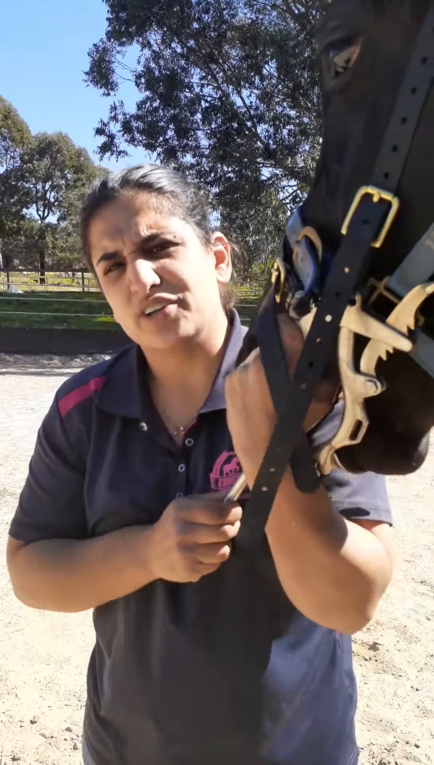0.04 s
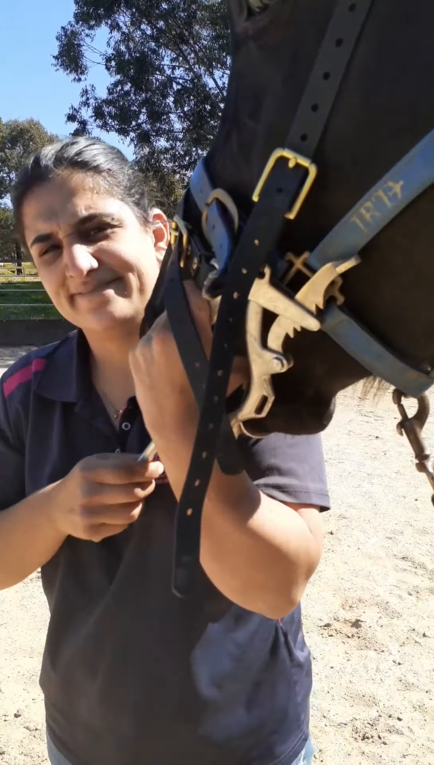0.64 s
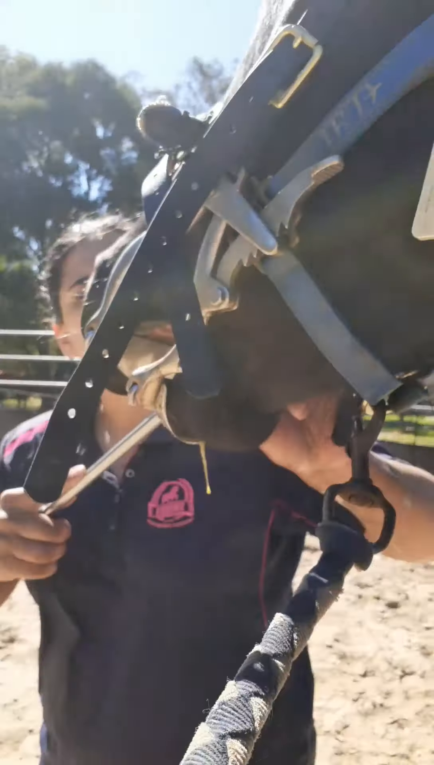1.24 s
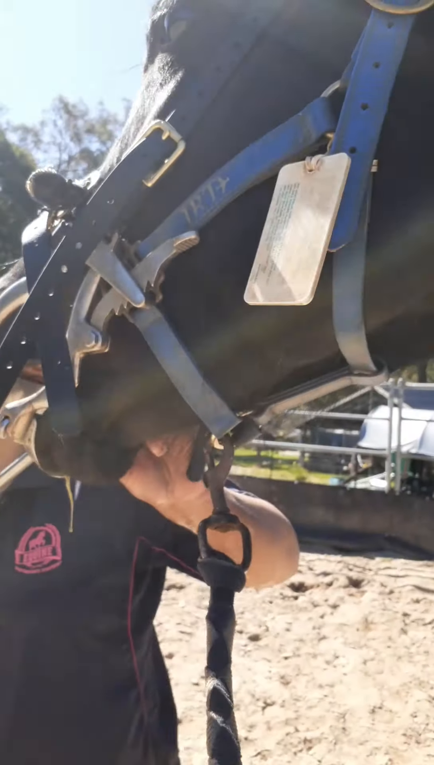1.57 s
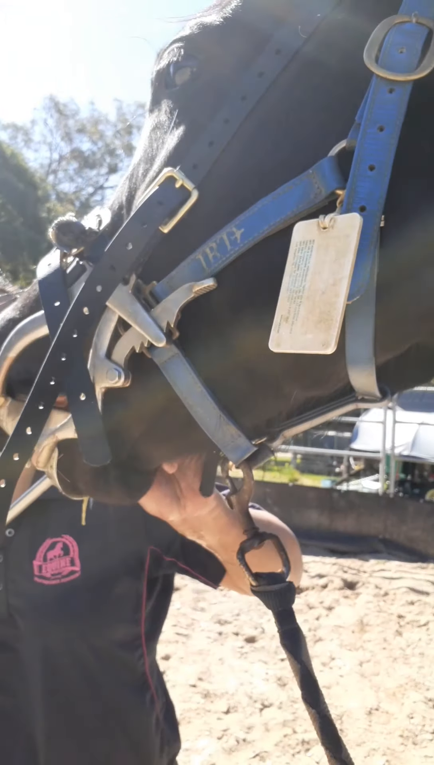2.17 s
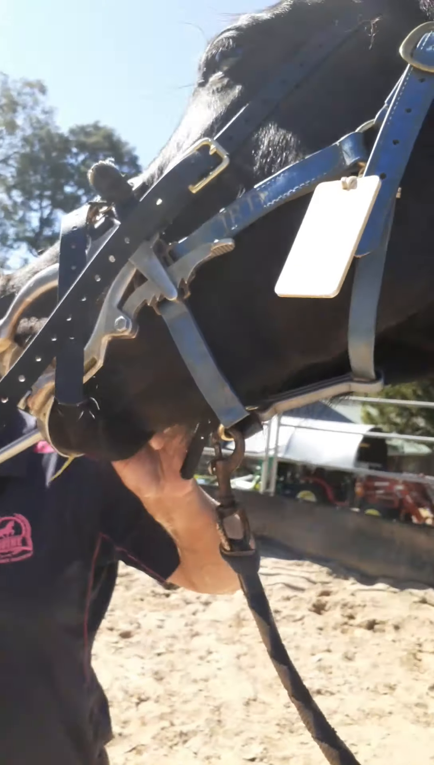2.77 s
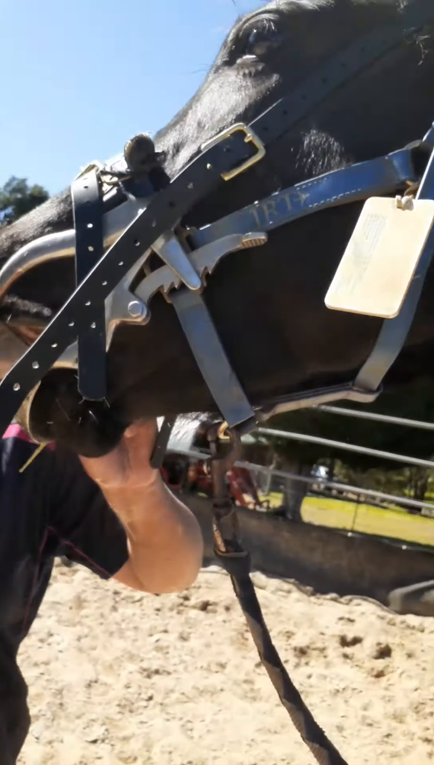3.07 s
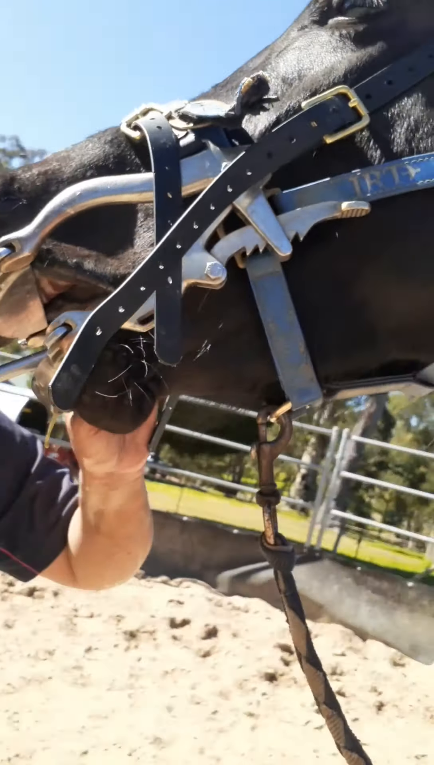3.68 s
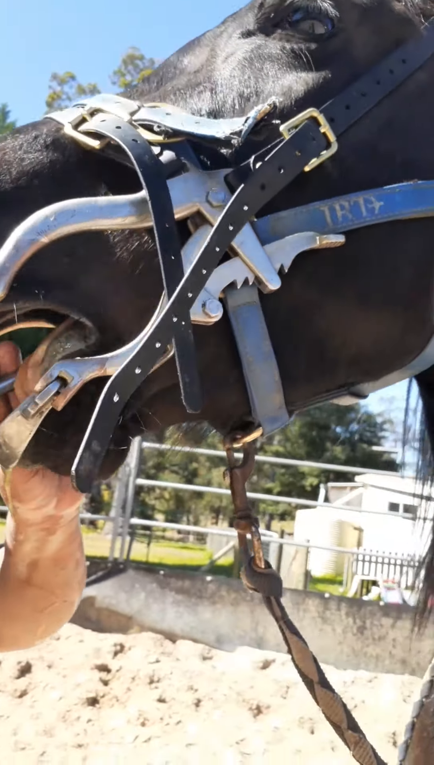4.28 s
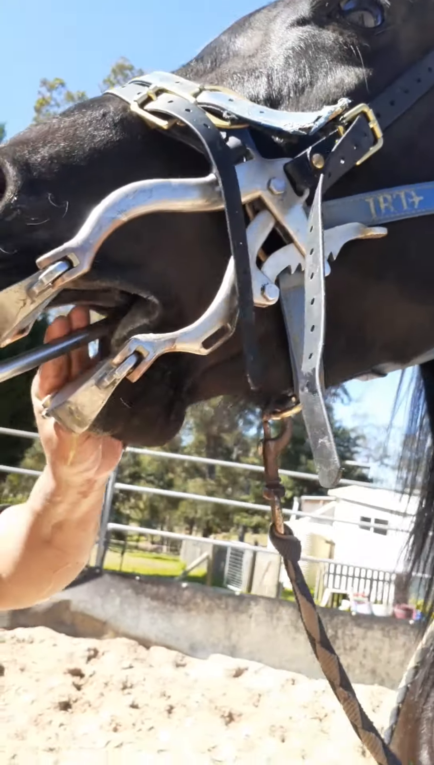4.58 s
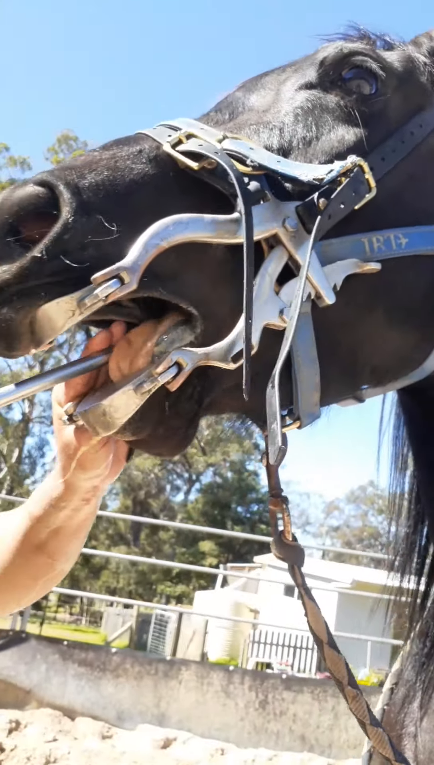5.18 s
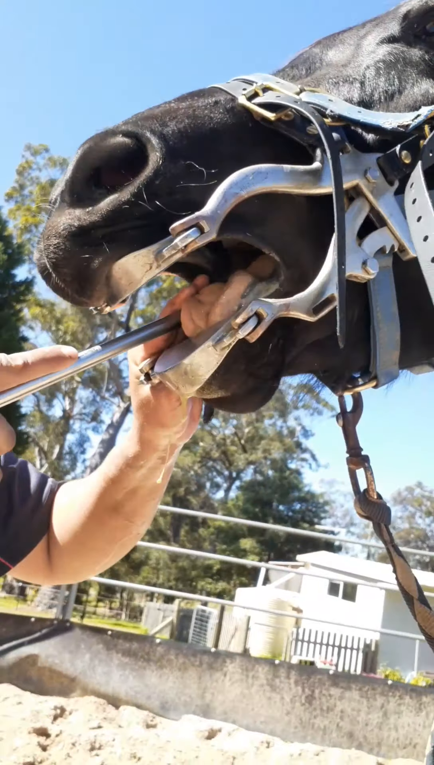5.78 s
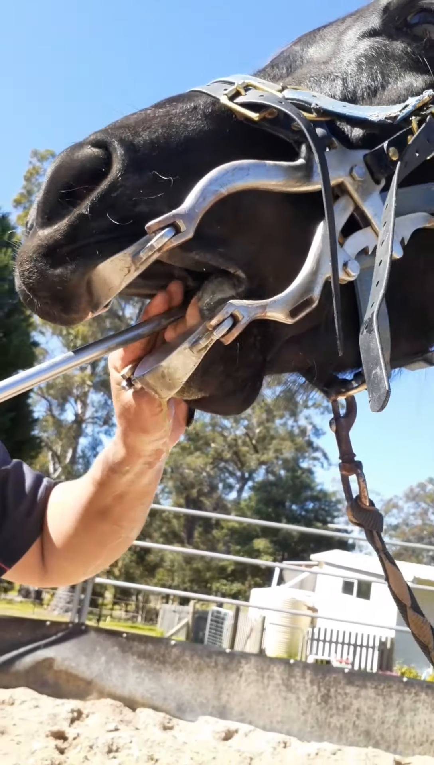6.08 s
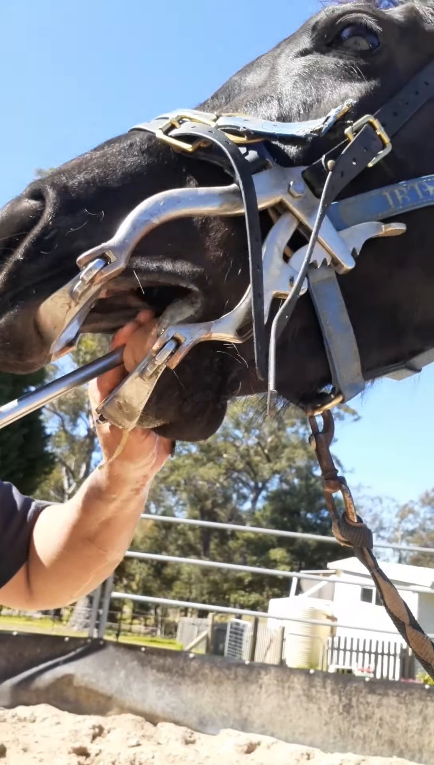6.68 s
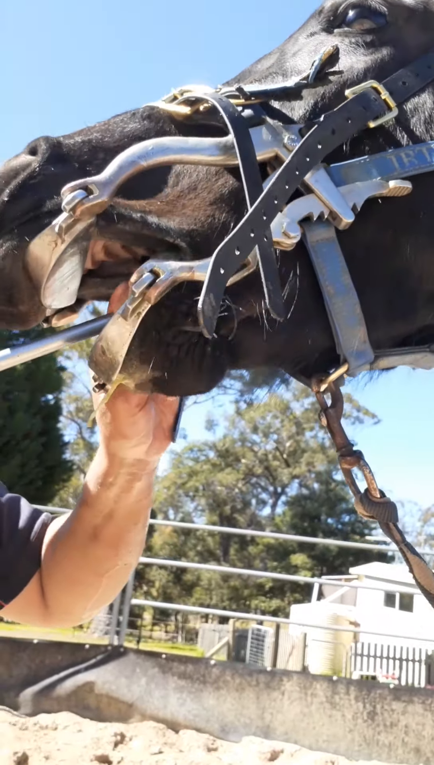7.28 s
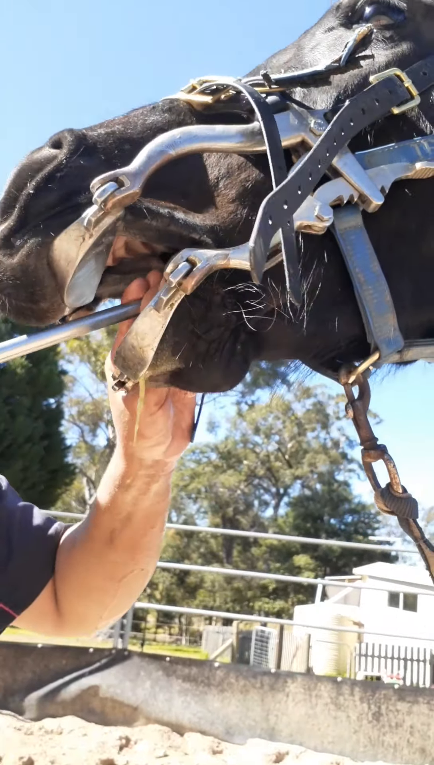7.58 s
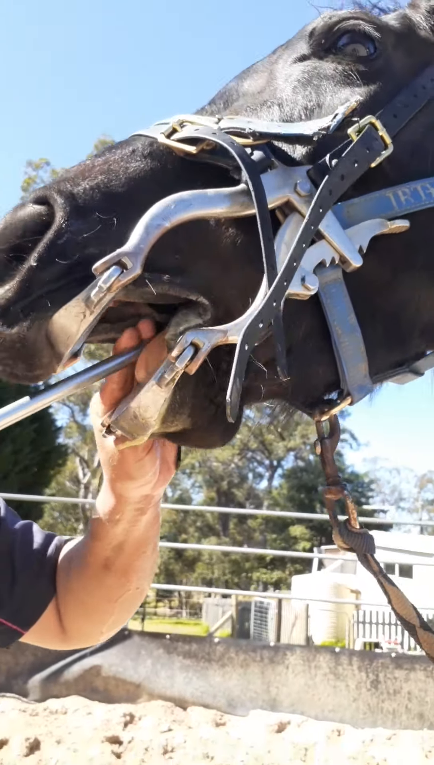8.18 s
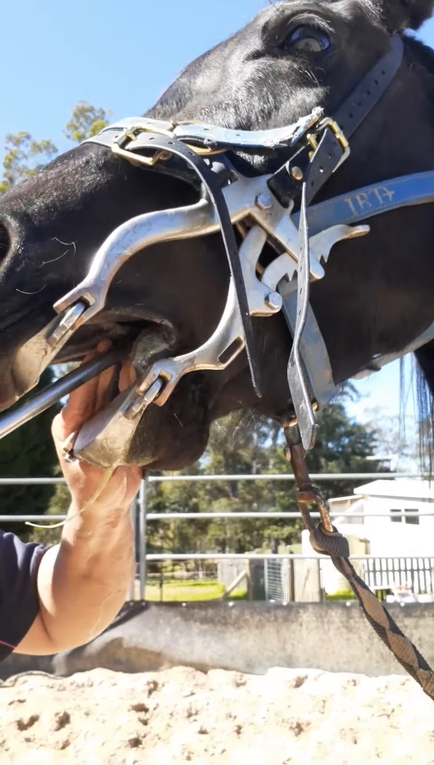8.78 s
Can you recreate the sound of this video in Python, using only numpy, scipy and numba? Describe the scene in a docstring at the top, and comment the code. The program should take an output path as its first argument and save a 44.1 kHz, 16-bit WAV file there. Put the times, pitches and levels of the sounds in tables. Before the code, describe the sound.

A steel hand file rasps on a horse's teeth close to the microphone, a gritty grinding over a hollow, jug-like boom from the open mouth. It begins with quick short rubs, with a dull bump on the jaw at about 0.4 seconds. From about 1.3 seconds the strokes lengthen into a steady rhythm of brighter pushes and duller pulls, a little over two pairs a second, continuing until the end near 9 seconds. The file often catches and gives tiny ragged squeaks, mostly around 2 seconds and from 4 to 8 seconds. Small metallic clicks against the mouth brace come at about 1.6, 3.9 to 4.6, 6, 7.3 and 8.6 seconds, with another short knock near 4.4 seconds. Light wind rumbles on the microphone around 1.4, 3.2 and 8.5 seconds, over a faint, steady outdoor hush.

```python
"""Quick, gritty rubs over a hollow boom: a steel hand rasp on a horse's cheek teeth, outdoors and close by.
Longer pushes and duller pulls follow in turn. Each chip of enamel is an impulse that excites the modes
of jaw and shaft, while the propped-open mouth booms like a jug, as a Helmholtz resonator.
The rasp catches, chatters by stick-slip, knocks on the metal gag and bumps the jaw.
Light wind brushes the microphone over a faint open-air hush."""
import sys
import numpy as np
from scipy import signal
from scipy.fft import rfft, irfft, next_fast_len
from scipy.io import wavfile
from scipy.ndimage import uniform_filter1d, map_coordinates
from numba import njit

SR = 44100
rng = np.random.default_rng(int(sys.argv[2]) if len(sys.argv) > 2 else 0)


def store_pcm(level_fs):
    """Save levels as 16-bit WAV."""
    pcm = np.round(np.clip(level_fs, -1, 1) * 32767).astype(np.int16)
    wavfile.write(sys.argv[1], SR, np.atleast_2d(pcm).T)


N = 389403
TIME = np.arange(N) / SR

# Strokes of the rasp: start t/s, length/s, grinding level/dB, boom re grinding/dB, brightness/dB,
# mouth resonance f/Hz
RUB_STROKES = [(-0.11, 0.14, -28.5, 2.5, 0, 350), (0.043, 0.18, -32, 6.5, 0, 378),
               (0.207, 0.19, -34, 5, 2.5, 381), (0.389, 0.15, -31.5, 7.5, -1, 366),
               (0.542, 0.16, -36.5, 11.5, 3, 347), (0.732, 0.12, -34, 8, -0.5, 342),
               (0.88, 0.14, -36, 13.5, 1.5, 358), (1.018, 0.162, -31.5, 4.5, -1.5, 371),
               (1.175, 0.14, -28, 3, 2.5, 364), (7.166, 0.072, -38.5, 10.5, 0.5, 346),
               (7.602, 0.071, -36.5, 13, -6, 320)]  # short and quick, over one spot
PUSH_STROKES = [(1.274, 0.2, -35, -3.5, -1, 354), (1.685, 0.21, -33.0, -1.5, -1.5, 348),
                (2.124, 0.21, -37, 2, 2.5, 381), (2.585, 0.2, -35.5, 7, -1.5, 354.6),
                (2.976, 0.2, -37, -5, -3, 358), (3.413, 0.21, -29, -2.5, -3, 399),
                (3.898, 0.13, -33, 7, 1, 412), (4.258, 0.22, -29.0, 0, -5.5, 367.4),
                (4.72, 0.19, -28.5, -4, -1.5, 387.6), (5.13, 0.224, -28.5, -4, 1, 375.5),
                (5.57, 0.2, -31, 0, -1, 337), (5.969, 0.19, -31, -0.5, -0.5, 339),
                (6.399, 0.1993, -36, 12, -0.5, 358), (6.823, 0.2, -28.0, 2, -2.5, 324),
                (7.245, 0.21, -26.5, 0, -4, 368), (7.68, 0.19, -29.5, 1, 0, 328),
                (8.086, 0.19, -32, -1.5, 2.5, 420), (8.543, 0.15, -37, 8, -2.5, 371)]  # forward: the teeth cut
PULL_STROKES = [(1.487, 0.2, -31, -4, -2, 400), (1.894, 0.22, -38, 3, -2.5, 334),
                (2.331, 0.24, -33, 0.5, -2, 381), (2.744, 0.18, -37, -2.5, -4.5, 360),
                (3.206, 0.2, -32, -2, -1.5, 357.4), (3.611, 0.21, -34.5, 7, -1, 354),
                (4.05, 0.219, -30.5, 1.5, -3.5, 381.7), (4.476, 0.25, -31.5, -1, 0, 378.4),
                (4.914, 0.21, -26.5, -2, -1, 364), (5.34, 0.25, -32, 5, 3, 341),
                (5.794, 0.2, -39.5, 14.5, 2.5, 392.6), (6.165, 0.23, -33, 4.5, -1.5, 337),
                (6.609, 0.211, -33, 8, 1.5, 377.4), (7.058, 0.11, -34.5, 8.5, -3, 348),
                (7.409, 0.19, -30, 2.5, -2.5, 324), (7.891, 0.21, -30.5, 6, -0.5, 371.6),
                (8.291, 0.21, -31.5, 7, -5, 318), (8.759, 0.096, -37, 8.5, -9, 401)]  # back: the teeth slide


def rasp():
    """Source and filter: one chipping force drives jaw, shaft and mouth; the strokes set their levels."""
    speed, boom, grind, shaft, grit = strokes()
    scrape_gain, boom_gain = catches()
    force = chipping(speed)
    body = jaw(force)
    hollow = spread(evened(band(body, 576, 2600), 0.11), scattered=0.22)
    grinding = from_db(-0.27) * ring_on(grind, 0.00033) * hollow
    ringing = from_db(0.5) * shaft * spread(evened(band(body, 2740, 4800), 0.094), scattered=0.37)
    gritty = from_db(0.5) * grit * spread(evened(band(body, 4870, 11100), 0.076), scattered=0.45)
    thudding = from_db(-21) * spread(rms_one(band(force, 196.6, 236, order=2)), scattered=0.067)
    cavity = spread(np.array([mouth(f) for f in force]), scattered=0.049)
    judder = from_db(2.43 * drift(70))  # the jaw is shaken unevenly
    booming = ring_on(boom * boom_gain * judder, 0.0072) * from_db(1.5) * cavity + boom * thudding
    scraping = scrape_gain * (grinding + ringing + gritty) + cheek_pocket(force) + chatter()
    return scraping * from_db([[0.4], [-0.4]]) + booming * from_db([[-0.4], [0.4]])


def strokes(grind_power=0.87, bright_power=1.37):
    """Friction noise grows with pressure and as a power of sliding speed, the treble most steeply."""
    speed, power = np.zeros(N), np.zeros((4, N))
    # strokes, shaft ring re grinding/dB, grit re grinding/dB, growth of pressure along the stroke/dB
    kinds = [(RUB_STROKES, -6, -11, 0.44), (PUSH_STROKES, -5, -7, 8.3), (PULL_STROKES, -6.5, -17, 5.7)]
    for rows, shaft_db, grit_db, growth_db in kinds:
        for start, length, db, boom_db, bright_db, _ in rows:
            on = slice(max(0, int(start * SR)), int((start + length) * SR))
            travel = np.clip((TIME[on] - start) / length, 0, 1)
            pace = np.sin(np.pi * travel) + 1e-6
            pressure = from_db(db + growth_db * (travel - 0.5))
            bright = from_db(bright_db) * pace ** bright_power
            parts = [from_db(boom_db) * pace, pace ** grind_power,
                     from_db(shaft_db) * bright, from_db(grit_db) * bright]
            power[:, on] += (pressure * np.array(parts)) ** 2  # overlapping strokes add in power
            speed[on] = np.maximum(speed[on], pace)
    boom, grind, shaft, grit = np.sqrt(power)
    return speed, boom, grind, shaft, grit


def chipping(speed, chips_per_s=6000, size_db=2.5, dust=0.25, grabs_per_s=110, grab_s=0.0054):
    """Brittle fracture: enamel chips off as shot noise. Two rows, for direct and scattered sound."""
    grabs = (rng.random(N) < grabs_per_s / SR) * rng.uniform(0.12, 7.7, N)
    bite = 1 + 0.87 * rms_one(ring_on(grabs + 1e-18, grab_s))  # sudden grabs swell the force
    breaks = rng.random(N) < chips_per_s * (0.3 + speed) / SR
    sizes = from_db(size_db * np.minimum(rng.exponential(1, N), 4))
    chips = rms_one(breaks * sizes * rng.standard_normal((2, N)))
    return bite * (chips + dust * rng.standard_normal((2, N)))


def jaw(force, broad_db=-7.0, wander=0.05, patchy_db=6.5):
    """Modal response: the resonances of jaw and rasp shift and trade strength as the contact travels."""
    # Broad spectrum of the scraping: f/Hz, relative spectral level/dB
    scrape_spectrum = [(290, -99), (500, -14), (922, 3.5), (1130, 3.5), (1510, -1), (1820, 0.5),
                       (2340, 3.5), (2740, -11), (3300, -11), (5190, -32), (8840, -13.5), (10900, -21),
                       (12000, -78), (15600, -73), (22000, -120)]
    # Modes of jaw, teeth and rasp from three listening places: f/Hz, bandwidth/Hz, relative level/dB
    front_modes = [(750, 230, 10), (1550, 81, -3), (2310, 110, -17), (3340, 150, -4.5), (3840, 130, -9),
                   (5420, 480, -13), (7640, 250, -22), (8800, 170, -7.5)]
    cheek_modes = [(673, 73, 2), (960, 71, -6), (1503, 150, -0.5), (2372, 21, 2), (3275, 110, -6.5),
                   (4620, 34, -14), (5570, 120, -34), (5810, 32, -12.5), (8490, 120, -18),
                   (9160, 63, -15.5)]
    muzzle_modes = [(912, 55, 8.5), (1497, 168, 2), (2265, 41, 0), (3306, 163, -4), (4593, 60, -13.5),
                    (5620, 110, -16.5), (6040, 260, -19.5), (7480, 39, -15.5), (8480, 200, -14.5),
                    (9570, 420, -22)]
    edges = [0, int(1.3 * SR), int(3.4 * SR), N]  # the listening place changes twice
    out = from_db(broad_db) * coloured(force, scrape_spectrum)
    for modes, first, last in zip([front_modes, cheek_modes, muzzle_modes], edges, edges[1:]):
        on, rings = slice(first, last), 0
        for hz, width, db in modes:
            centre = hz * (1 + wander * drift(14)[on] * min(1, np.sqrt(1000 / hz)))
            gain = from_db(db + patchy_db * drift(18)[on])
            rings = rings + gain * np.array([resonate(f[on], centre, float(width), SR) for f in force])
        out[:, on] += rms_one(rings)
    return out


def mouth(force, width_hz=24.0, skirt_hz=95.0, waver=0.013, steady_s=0.049):
    """Helmholtz resonance: the air in the open mouth booms at a pitch set by the gape."""
    pitches = [(start + length * part, hz)
               for start, length, *_, hz in [*RUB_STROKES, *PUSH_STROKES, *PULL_STROKES]
               for part in (0.25, 0.75)]
    hz = curve(sorted(pitches)) * (1 + waver * drift(22))
    ring = resonate(force, hz, width_hz, SR)
    return evened(resonate(ring, hz, skirt_hz, SR), steady_s)


def catches(rise_s=0.0086, scrape_s=0.026, boom_s=0.019):
    """Loading and release: the force jumps at an enamel point and relaxes. Gains for scrape and boom."""
    # Catches on enamel points: t/s, change of scrape level/dB, change of boom level/dB
    snags = [(0.12,5,4.5), (0.331,2,1), (.174,5,-4), (.471,-0.5,0), (.756,4,8), (.937,4,-2), (1.056,1,9),
             (1.132,2.5,9), (1.22,1,1), (1.437,7.5,12), (1.533,6,10), (1.773,-1,14), (1.851,5.5,11.5),
             (1.963,8.5,10), (2.069,9.5,-7), (2.403,0,7.5), (2.681,7,-4), (2.819,7,19), (3.111,6,17),
             (3.127,3,12.5), (3.249,1,11.5), (3.437,2.5,-3), (4.125,0,7), (4.197,5,7), (4.42,-0.5,-5),
             (5.054,1,7.5), (5.084,9,13.5), (5.19,1.5,4), (5.519,6,8.5), (5.65,3,13), (5.898,14.5,-3),
             (5.932,15,-7), (6.13,6,16), (6.337,10.5,4), (6.42,14,-5), (6.446,8,5), (6.476,8.5,10),
             (6.736,6.5,-9), (6.758,2.5,2), (6.896,5.5,1), (6.992,4,8), (7.09,3,-1.5), (7.36,3.5,6),
             (7.616,9,1), (7.815,3,13.5), (8.038,9.5,7), (8.178,4,9), (8.214,5.5,-1.5), (8.4,2.5,4),
             (8.563,9,14), (8.636,12.5,-2)]
    t, scrape, boom = TIME[::20], 0, 0
    for at, scrape_db, boom_db in snags:
        scrape = scrape + scrape_db * gaussian(t - at, np.where(t < at, rise_s, scrape_s))
        boom = boom + boom_db * gaussian(t - at, np.where(t < at, rise_s, boom_s))
    return from_db(np.interp(TIME, t, scrape)), from_db(np.interp(TIME, t, boom))


def cheek_pocket(force, width_hz=120.0, skirt_hz=500.0, waver=0.046, swell_power=0.74):
    """Cavity resonance: the rasp opens a pocket between cheek and teeth, whose note glides with it."""
    # Notes of the pocket: start t/s, length/s, first f/Hz, last f/Hz, level/dB
    glides = [(1.31,0.18,1420,2210,-34.5), (1.52,0.17,2230,2290,-32.5), (1.69,0.22,1400,852,-33.5),
              (1.92,0.19,1100,1300,-37), (2.14,0.2,1210,990,-36), (3.24,0.17,2200,2100,-38),
              (3.43,0.14,1450,990,-43.5), (3.64,0.21,900,760,-35.5), (3.93,0.095,1450,1730,-23.5),
              (4.05,0.11,1730,1430,-40), (5.17,0.19,1260,1470,-29), (5.37,0.19,1570,1430,-30),
              (5.6,0.26,1130,950,-38), (5.85,0.079,1260,1800,-28), (6.25,0.15,1250,1410,-38),
              (6.42,.16,1300,890,-38), (7.07,.07,1780,2200,-28), (8.33,0.11,1500,1520,-37)]
    pitches, strength = [], 0
    for start, length, first_hz, last_hz, db in glides:
        pitches += [(start, first_hz), (start + length, last_hz)]
        swell = np.sin(np.pi * np.clip((TIME - start) / length, 0, 1))
        strength = strength + from_db(db) * swell ** swell_power
    hz = curve(pitches) * (1 + waver * drift(45))
    rings = [resonate(resonate(f, hz, width_hz, SR), hz, skirt_hz, SR) for f in force]
    return strength * spread(evened(np.array(rings), 0.23), scattered=0.15)


def chatter(rough=0.035, flutter_db=3.5):
    """Stick-slip oscillation locks on to one resonance and gives a short, ragged near-tone."""
    # Squeals: centre t/s, half length/s, f/Hz, level/dB
    squeals = [(1.346,0.015,1464,-20.5), (1.569,0.016,2320,-22), (2.02,.09,3170,-33.5),
               (2.07,.012,3300,-28.5), (2.159,0.048,3200,-36), (2.682,.025,3230,-29), (3.959,.012,1537,-17),
               (3.981,.012,1746,-18), (4.822,.022,943,-22), (5.021,0.045,970,-22), (5.534,0.036,1410,-20.5),
               (6.318,0.056,937,-22.5), (6.915,.024,1537,-16.5), (7.207,0.036,1508,-26),
               (7.37,0.021,960,-16), (7.525,.052,1540,-21.5), (7.785,0.063,919,-22.5),
               (8.012,0.032,1520,-22), (8.014,0.077,2400,-25.5), (8.038,0.017,3350,-31)]
    out = np.zeros(N)
    waver = 1 + rough * drift(450)
    flutter = from_db(flutter_db * drift(220))
    for at, half_s, hz, db in squeals:
        on = np.flatnonzero(np.abs(TIME - at) < half_s)
        swell = np.cos(np.pi / 2 * (TIME[on] - at) / half_s) ** 4
        out[on] += from_db(db) * swell * np.sin(2 * np.pi * np.cumsum(hz * waver[on]) / SR)
    return out * flutter


def gag_clinks(ring_db=20.0, ring_t60=0.018, knock_db=-8.0, knock_t60=0.027, crack_db=23.0, crack_t60=0.05):
    """Hard impact: steel on steel excites a wide band of modes, damped quickly by lips and hand."""
    # Knocks on the gag: t/s, base level of knock and ring/dB, ring f/Hz, base level of crack/dB
    impacts = [(1.5618, -38, 2250, -88), (3.9035, -46, 1940, -79), (3.9316, -40, 1560, -49),
               (4.1111, -50, 1580, -55.5), (4.4543, -37.5, 8700, -44.5), (4.5918, -36, 1320, -43.5),
               (5.9693, -39, 1710, -48.5), (6.0512, -29.5, 4356, -50), (6.1807, -46, 1206, -71),
               (7.302, -37, 1440, -44), (8.2921, -41.5, 1970, -75), (8.5607, -38, 4248, -82),
               (8.5964, -26.5, 4050, -73), (8.7779, -37.5, 971, -54)]
    out, t = np.zeros((2, N + SR)), TIME[:SR // 8]
    for at, db, hz, treble_db in impacts:
        noise = spread(rng.standard_normal((2, len(t))), scattered=0.64)
        crack = rms_one(band(noise, 1100, 10200, order=1)) * decay(t, treble_db + crack_db, crack_t60)
        knock = rms_one(band(noise, hz / 2, hz * 2, order=2)) * decay(t, db + knock_db, knock_t60)
        ring = np.sin(2 * np.pi * hz * t) * decay(t, db + ring_db, ring_t60)
        first = int(at * SR)
        out[:, first:first + len(t)] += crack + knock + ring
    return out[:, :N]


def jaw_bumps(rise_s=0.0023):
    """Soft impact: each blow leaves one low mode in damped free vibration."""
    # Blows on the jaw: t/s, f/Hz, level/dB, decay time t60/s
    blows = [(0.423, 235, -14, 0.14), (4.379, 550, -13.5, 0.056)]
    out = np.zeros(N)
    for at, hz, db, t60 in blows:
        t = np.clip(TIME - at, 0, 1)
        out += np.sin(2 * np.pi * hz * t) * (1 - np.exp(-t / rise_s)) * decay(t, db, t60)
    return out


def wind(breeze_db=-64, gain_db=4.5, buffet_db=7.2):
    """Turbulence: eddies press on the microphone as a lumpy rumble, partly separate in each channel."""
    # Spectrum of the eddies: f/Hz, relative spectral level/dB
    eddy_spectrum = [(20, -15), (60, 4.5), (110, 3), (200, -6), (290, -3), (480, -60)]
    # Gusts: centre t/s, half width/s, relative level/dB
    gusts = [(1.405, 0.1, -40.5), (2.213, .12, -51), (3.194, 0.11, -43.5), (7, 1.17, -60.5),
             (8.477, 0.3, -46)]
    eddies = band(coloured(rng.standard_normal((2, N)), eddy_spectrum), 34, 260, order=2)
    flow = from_db(breeze_db) + sum(from_db(db) * gaussian(TIME - at, half) for at, half, db in gusts)
    return flow * from_db(gain_db + buffet_db * drift(29)) * spread(rms_one(eddies), scattered=0.44)


def open_air(level_db=-49.5):
    """Ambient noise: the steady hush of an open paddock, partly coherent between the ears."""
    # Spectrum of the hush: f/Hz, relative spectral level/dB
    hush_spectrum = [(40, -19), (150, 6.5), (400, 0), (1000, -12.5), (3000, -17), (11000, -30.5)]
    return from_db(level_db) * spread(coloured(rng.standard_normal((2, N)), hush_spectrum), scattered=0.23)


def from_db(db):
    """Amplitude ratio of a level."""
    return 10 ** (np.asarray(db) / 20)


def rms_one(x):
    """Normalisation to unit rms."""
    return x / np.sqrt(np.mean(x ** 2) + 1e-20)


def decay(t, db, t60):
    """Exponential damping: the level falls from db by 60 dB every t60 seconds."""
    return from_db(db - 60 * t / t60)


def gaussian(t, width):
    """Gaussian pulse, down to 1/e at t = width."""
    return np.exp(-np.minimum((t / width) ** 2, 20))


def curve(rows):
    """Linear interpolation through (t/s, value) points."""
    return np.interp(TIME, *np.transpose(rows))


def drift(rate):
    """Random modulation of unit rms that takes a new value rate times a second."""
    return rms_one(np.interp(TIME * rate, np.arange(8000), rng.standard_normal(8000)))


def band(x, low_hz, high_hz, order=4):
    """Band-pass filtering with a flat top."""
    return signal.sosfilt(signal.butter(order, [low_hz, high_hz], "band", fs=SR, output="sos"), x)


def coloured(x, points):
    """Spectral shaping through (f/Hz, level/dB) points, to unit rms."""
    hz, db = np.transpose(points)
    size = next_fast_len(N)
    log_hz = np.log(np.maximum(np.fft.rfftfreq(size, 1 / SR), 1))
    gain = from_db(np.interp(log_hz, np.log(hz), db))
    return rms_one(irfft(rfft(x, size) * gain, size)[..., :N])


def evened(x, seconds):
    """Division by the running rms holds the level at 1 and keeps grain finer than seconds."""
    size = int(seconds * SR / 2) + 1
    power = np.mean(np.atleast_2d(x) ** 2, axis=0)
    return x / np.sqrt(np.abs(uniform_filter1d(uniform_filter1d(power, size), size)) + 1e-12)


@njit
def resonate(x, hz, width, rate):
    """Driven damped oscillator with a moving centre frequency and unit peak gain."""
    y, r = np.zeros(len(x)), np.exp(-np.pi * width / rate)
    for i in range(2, len(x)):
        drive = (1 - r * r) / 2 * (x[i] - x[i - 2])
        y[i] = drive + 2 * r * np.cos(2 * np.pi * hz[i] / rate) * y[i - 1] - r * r * y[i - 2]
    return y


def ring_on(level, seconds):
    """First-order lag: a resonance swells and dies a little after its drive."""
    keep = np.exp(-1 / (seconds * SR))
    return signal.lfilter([1 - keep], [1, -keep], level)


def spread(pair, scattered):
    """Interaural coherence: direct sound is alike in both ears, the scattered share of power is not."""
    return np.sqrt(1 - scattered) * pair[0] + np.sqrt(scattered) * pair[1] * np.array([[1], [-1]])


def scene():
    """Superposition of the sources; the far ear hears the mouth a little later."""
    # Interaural time difference of the mouth: t/s, lead of the left ear/ms
    left_lead = [(0, 0.012), (2.6, 0.05), (4.3, 0.11), (7.4, 0.16), (8.8, 0.13)]
    left, right = rasp() + gag_clinks() + jaw_bumps()
    delay = curve(left_lead) * SR / 1000
    right = map_coordinates(right, [np.arange(N) - delay], order=3)
    return np.array([left, right]) + wind() + open_air()


def record(dry, ceiling=0.6, cutoff_hz=11500):
    """Soft saturation rounds the highest peaks, and a steep low-pass limits the bandwidth."""
    rounded = ceiling * np.tanh(dry / ceiling)
    return signal.sosfilt(signal.ellip(10, 0.3, 80, cutoff_hz, fs=SR, output="sos"), rounded)


dry = scene()
out = record(dry)
store_pcm(out)
```